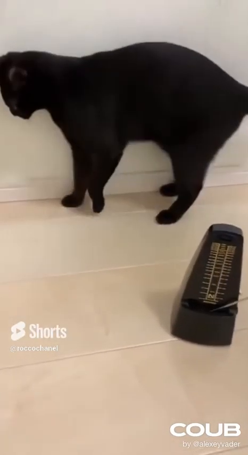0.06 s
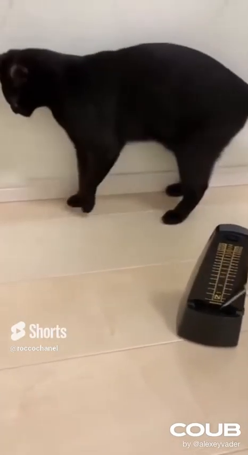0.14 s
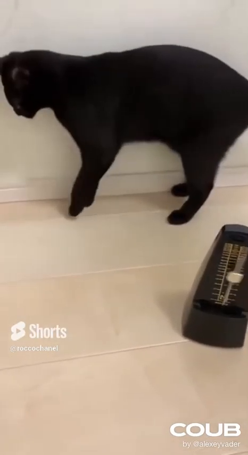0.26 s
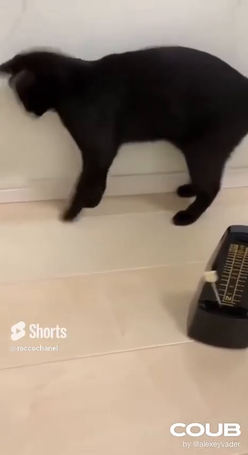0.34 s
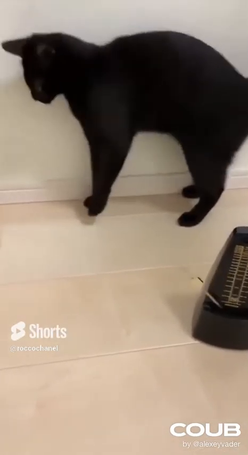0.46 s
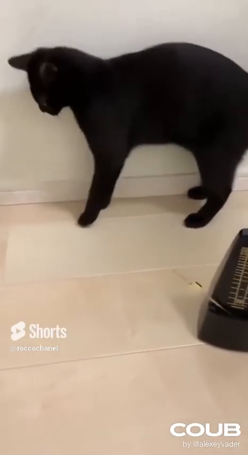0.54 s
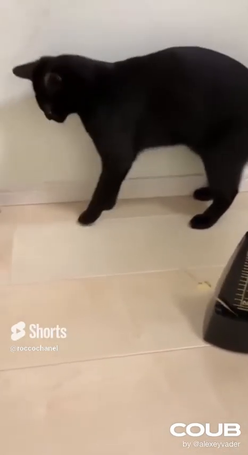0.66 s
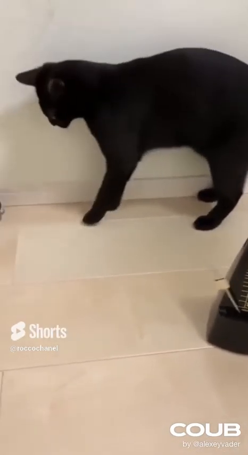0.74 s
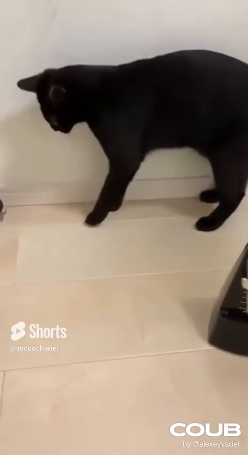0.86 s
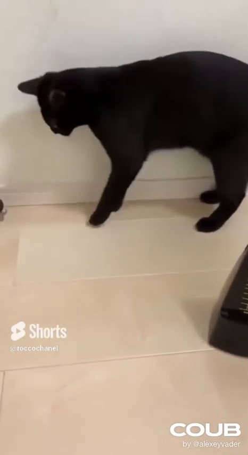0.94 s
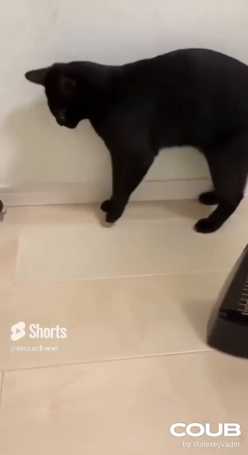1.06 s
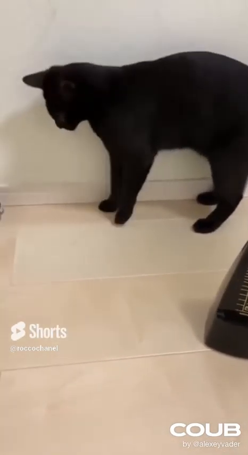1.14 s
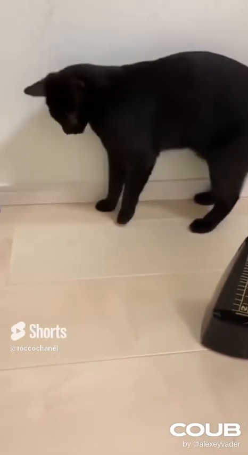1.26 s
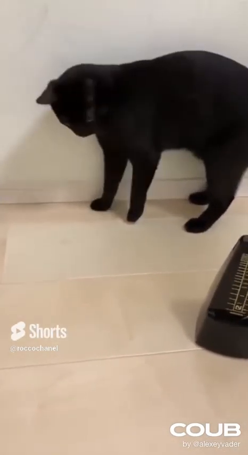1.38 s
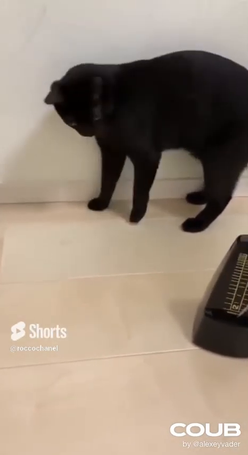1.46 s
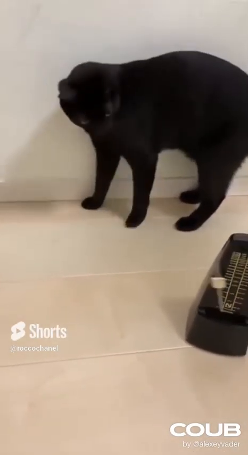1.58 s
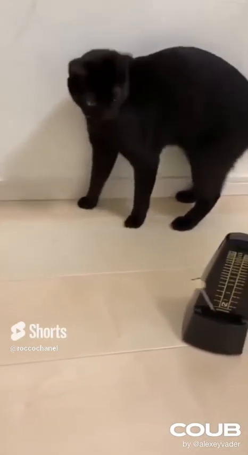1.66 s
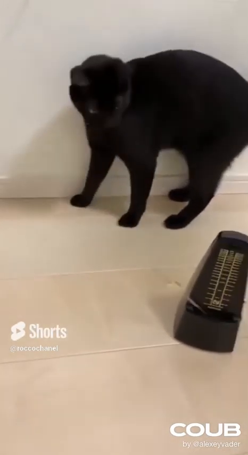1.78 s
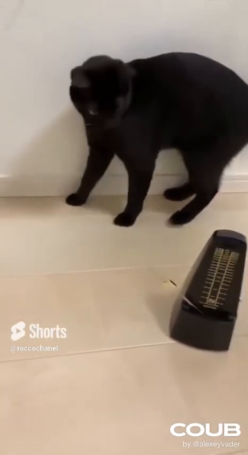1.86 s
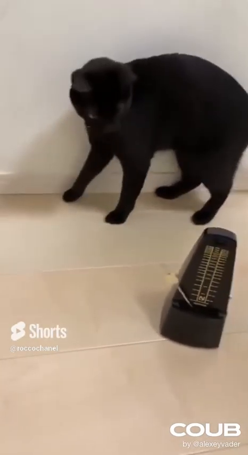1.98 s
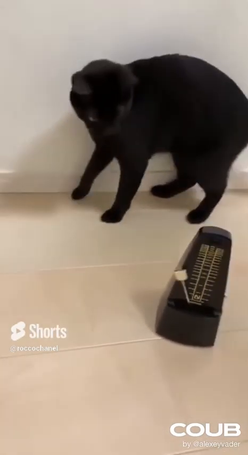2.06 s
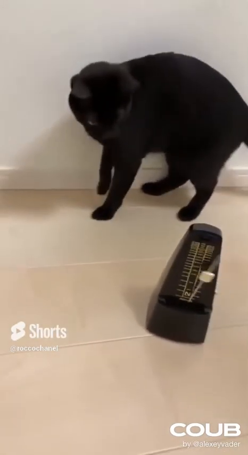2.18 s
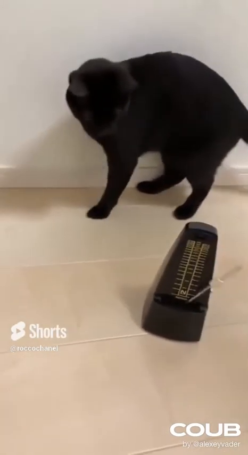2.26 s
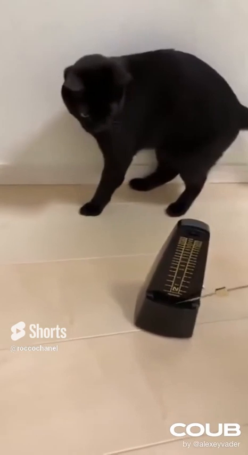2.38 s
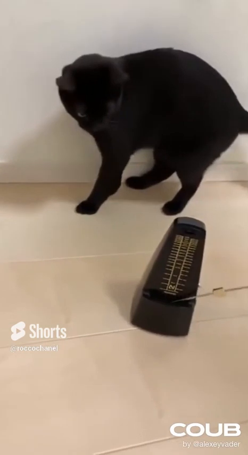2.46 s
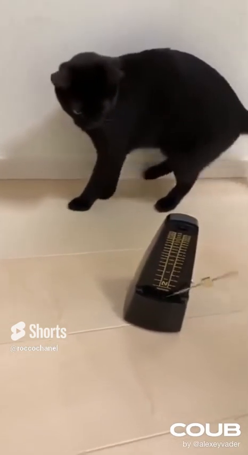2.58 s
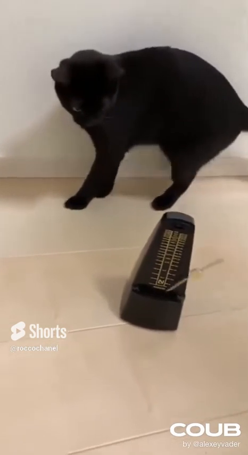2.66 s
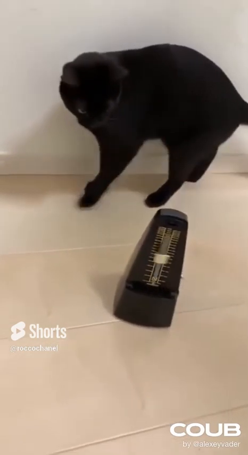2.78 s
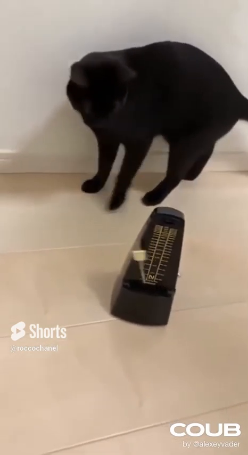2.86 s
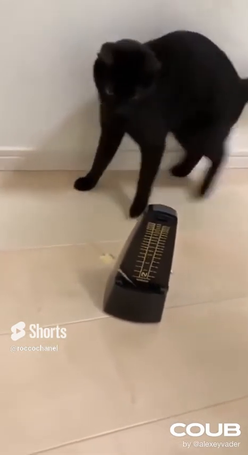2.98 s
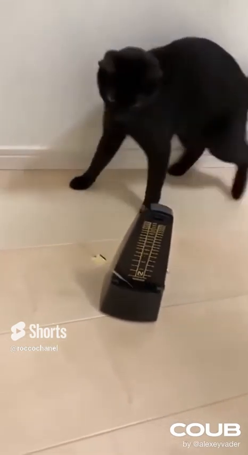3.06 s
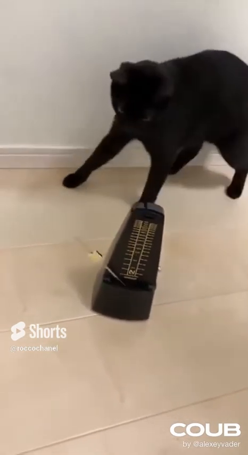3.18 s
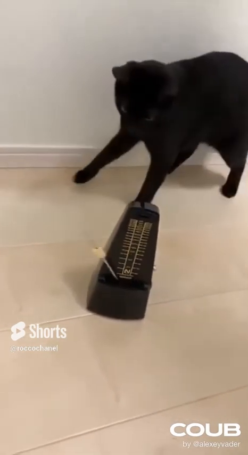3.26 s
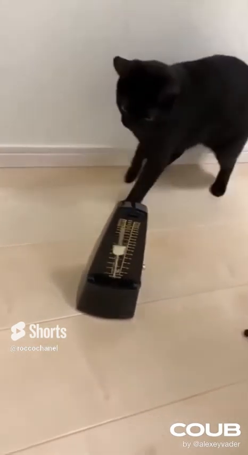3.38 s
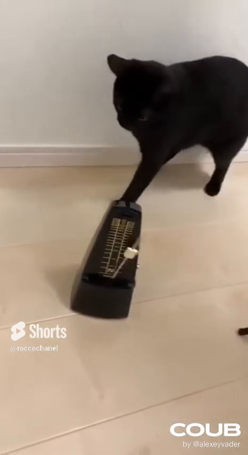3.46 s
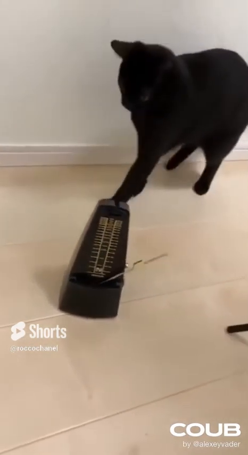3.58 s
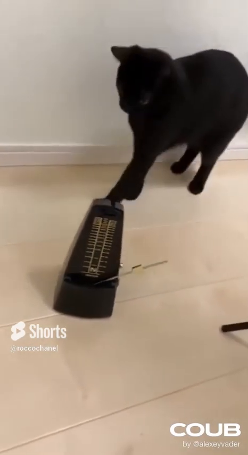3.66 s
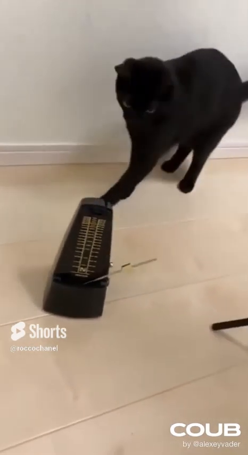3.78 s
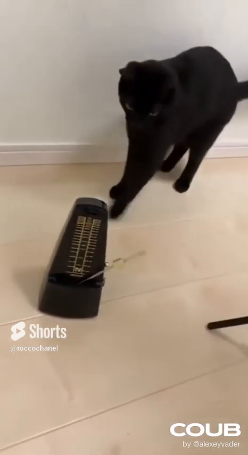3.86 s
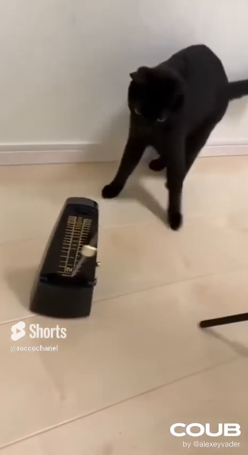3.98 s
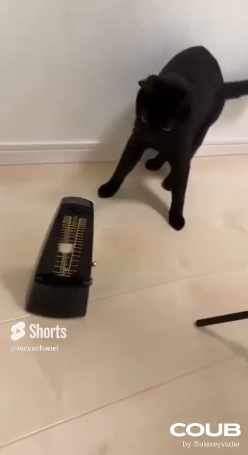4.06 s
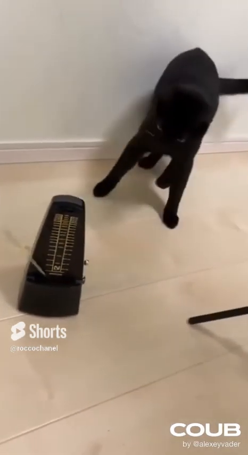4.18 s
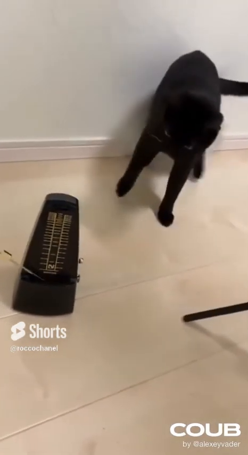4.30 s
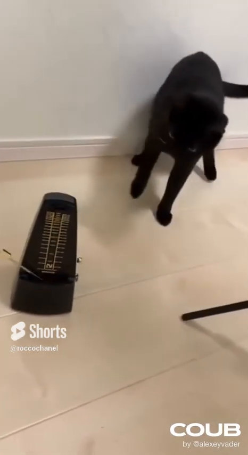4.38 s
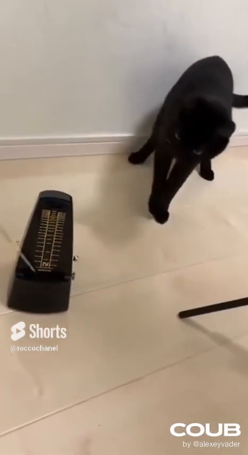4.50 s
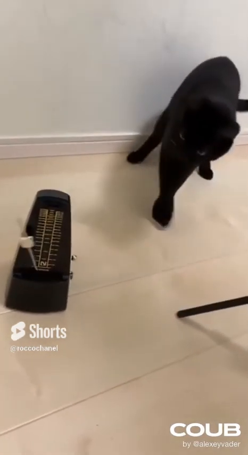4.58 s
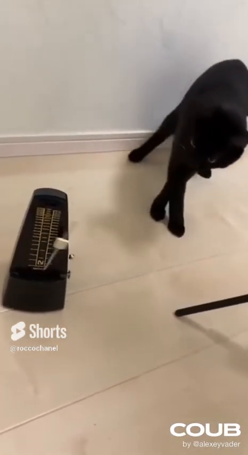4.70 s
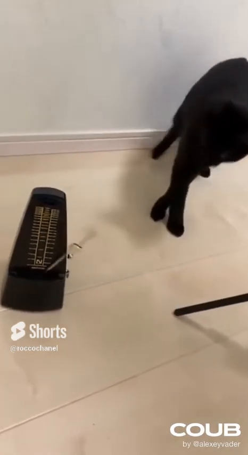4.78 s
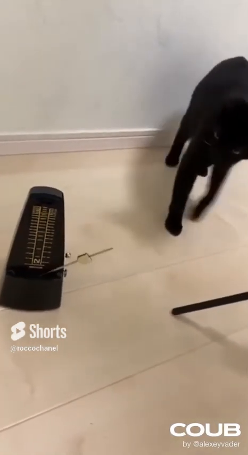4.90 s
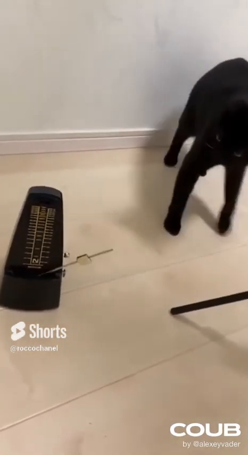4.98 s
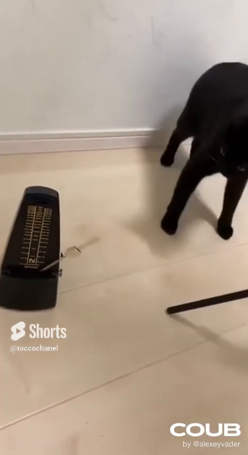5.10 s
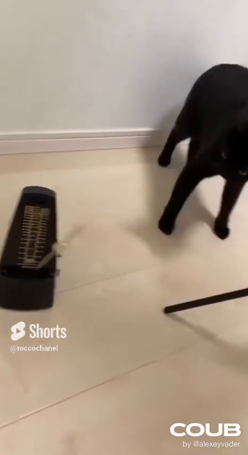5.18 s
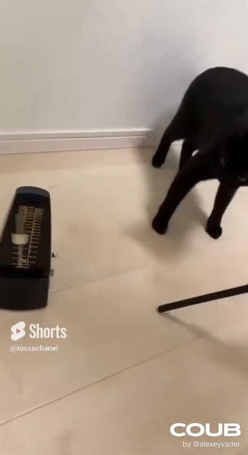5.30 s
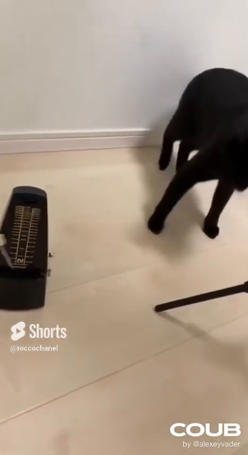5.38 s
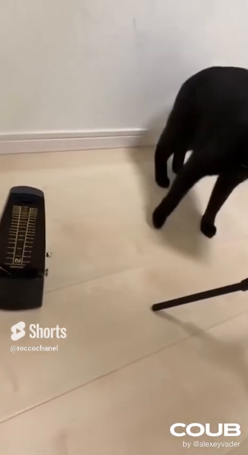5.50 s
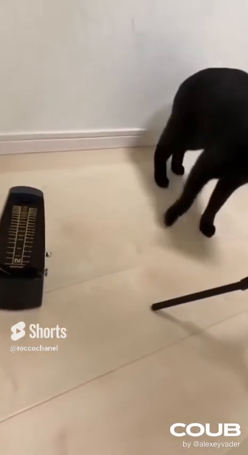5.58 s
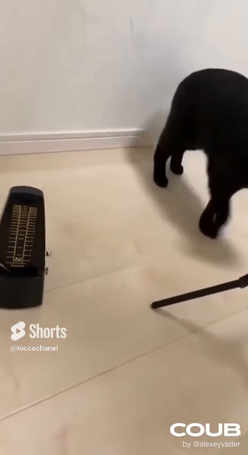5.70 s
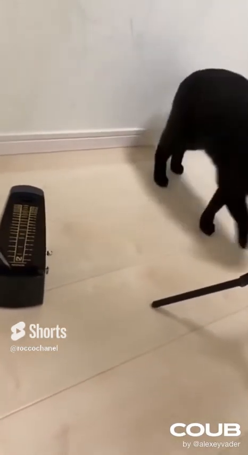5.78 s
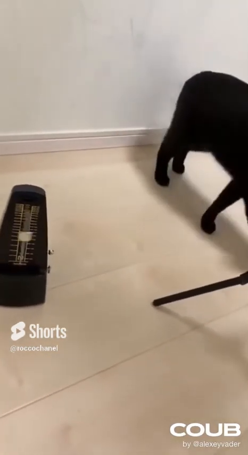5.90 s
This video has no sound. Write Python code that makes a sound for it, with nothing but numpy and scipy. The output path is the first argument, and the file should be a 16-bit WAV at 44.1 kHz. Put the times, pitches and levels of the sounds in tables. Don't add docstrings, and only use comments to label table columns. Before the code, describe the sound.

A wind-up metronome on a wooden floor gives nine hard, rattling plastic clacks, evenly spaced at about 95 per minute, each with a short diffuse room tail. Between them a cat's paws make soft, deep thuds and barely audible scuffs on the boards. A faint hum and thin hiss lie beneath. Close hand-held stereo pickup in a small bare room, slightly saturated, with patchy highs.

```python
import sys
import numpy as np
from scipy import signal
from scipy.fft import rfft, irfft, next_fast_len
from scipy.io import wavfile
from scipy.ndimage import uniform_filter1d

SR = 44100
rng = np.random.default_rng(int(sys.argv[2]) if len(sys.argv) > 2 else 0)


def inscribe(sig):
    pcm = np.round(np.clip(np.atleast_2d(sig).T, -1, 1) * 32767)
    wavfile.write(sys.argv[1], SR, pcm.astype(np.int16))


def amplitude_ratio(level_db):
    exponent = np.asarray(level_db, float) / 20
    return 10 ** exponent


N = 261954


def rms_one(x):
    return x / np.sqrt(np.mean(x ** 2) + 1e-20)


def at_hz(points, hz):
    table = np.array(points)
    return np.interp(np.log(np.maximum(hz, 1)), np.log(table[:, 0]), table[:, 1])


def ring(clicks, hz, t60):
    r, w = amplitude_ratio(-60 / (t60 * SR)), 2 * np.pi * hz / SR
    return signal.lfilter([0, np.sin(w)], [1, -2 * r * np.cos(w), r * r], clicks + 1e-18)


def swell_ring(clicks, hz, t60, swell):
    t = np.arange(round(swell * SR)) / SR
    push = 4 * np.hanning(len(t)) * np.sin(2 * np.pi * hz * t) / len(t)
    return ring(signal.fftconvolve(clicks, push)[:len(clicks)], hz, t60)


def stereo_noise(spectrum, likeness, size):
    hz = np.fft.rfftfreq(size, 1 / SR)
    mid, side = rfft(rng.standard_normal((2, size)))
    alike = np.clip(at_hz(likeness, hz), -1, 1)
    pair = np.sqrt(1 + alike) * mid + np.sqrt(1 - alike) * side * [[1], [-1]]
    return rms_one(irfft(pair * amplitude_ratio(at_hz(spectrum, hz)), size))


def add(out, piece, s):
    i = max(round(s * SR), 0)
    out[:, i:i + piece.shape[-1]] += piece[..., :N - i]


# [t/s, level/dB]
AIR = [(0.0, -61), (0.53, -59.5), (0.81, -61.5), (1.59, -61), (2.05, -58.5), (2.3, -61.5), (2.43, -60),
       (2.58, -65.5), (2.85, -64.5), (3.4, -62.5), (4.05, -59.5), (4.25, -59), (4.43, -63.5), (4.65, -63.5),
       (4.86, -61.5), (5.94, -60)]
# [f/Hz, density/dB per Hz]
HUM = [(15, -47.5), (25, -18.5), (37, -13.5), (86, -9), (129, -30), (162, -19), (187, -11), (280, -21),
       (308, -8.5), (364, -2.5), (386, -7), (400, -27.5), (430, -31), (560, -62.5), (950, -120)]
DRAUGHT = [(400, -30), (450, 1.5), (700, -4), (1000, -13), (1600, -16.5), (2500, -42.5)]
HISS = [(1000, -20), (1600, -1), (3100, -2), (4400, -6), (4800, -8), (5600, -2.5), (8500, -6.5),
        (11800, -9), (12300, -25), (16000, -31.5)]
# [f/Hz, left-right likeness/1]
AIR_LIKENESS = [(60, 0.98), (180, 1), (350, 0.96), (600, 0.28), (1650, .4), (5000, 0.85), (6500, .93),
                (15000, 0.56)]
DRAUGHT_DB, DRAUGHT_FOLLOWS, HISS_DB, HISS_FOLLOWS = -75.5, .6, -82, .2
LINGER_S, DRAUGHT_LINGER_DB, HISS_LINGER_DB = 0.18, 9, 5.5


def air():
    t, size = np.arange(N) / SR, next_fast_len(N)
    hum_db = np.interp(t, *np.transpose(AIR))
    swing_db = hum_db - hum_db.mean()
    linger = sum((t > s) * np.exp(-np.abs(t - s) / LINGER_S) for s, *_ in TICKS)
    draught_db = DRAUGHT_DB + DRAUGHT_FOLLOWS * swing_db + DRAUGHT_LINGER_DB * linger
    hiss_db = HISS_DB + HISS_FOLLOWS * swing_db + HISS_LINGER_DB * linger
    layers = zip([HUM, DRAUGHT, HISS], [hum_db + 3.0, draught_db, hiss_db])
    return sum(amplitude_ratio(db) * stereo_noise(colour, AIR_LIKENESS, size)[:, :N] for colour, db in layers)


# [t/s, peak level/dB, lower board mode against the upper/dB]
PAWS = [(0.0, -48.5, 0), (.417, -30.5, -10.5), (1.029, -42.5, -7), (1.666, -38, -8), (2.325, -40.5, 4.5),
        (2.921, -43.5, -1.5), (3.142, -36.5, -2), (3.562, -35, -2), (4.153, -50, -3.5), (4.267, -45, -1.5),
        (4.833, -35.5, -0.5), (5.135, -55, -4.5), (5.458, -30.5, -5.5)]
# [f/Hz, t60/s, swell/s]
BOARDS = [(52.8, .45, 0.076), (76.3, 0.34, 0.01)]


def paws():
    out = np.zeros(N)
    for k, (hz, t60, swell) in enumerate(BOARDS):
        clicks = np.zeros(N)
        for s, peak_db, low_db in PAWS:
            clicks[max(round(s * SR), 0)] = amplitude_ratio(peak_db - 1.5 + (0 if k else low_db))
        out += swell_ring(clicks, hz, t60, swell)
    return out


# [lead/s, rms level at the attack/dB, fainter early swell against it/dB]
SMEARS = [(.022, -23.5, -21), (.028, -29, -30.5), (.02, -33, -39.5), (0.037, -32, -23.5),
          (0.027, -29, -39.5), (0.012, -29.5, -13.5), (0.0084, -26, -17.5), (0.022, -33, -26.5),
          (0.026, -30.5, -37)]
SMEAR_POWER = 1.6
FAINT_LEAD_S, SMEAR_FADE_S = 0.039, .012


def smears():
    out, ahead_s = np.zeros((2, N)), .06
    t = np.arange(4096) / SR - ahead_s
    for (lead, level_db, faint_db), (start, _, pan_db, _, alike) in zip(SMEARS, TICKS):
        swell = np.clip(1 + t / lead, 0, 1) ** SMEAR_POWER
        swell += amplitude_ratio(faint_db) * np.clip(1 + t / FAINT_LEAD_S, 0, 1)
        fade = np.exp(-np.maximum(t, 0) / SMEAR_FADE_S)
        noise = stereo_noise(CRACK, [(200, 1.0), (6000, 0.27 + 0.19 * alike), (10000, alike)], 4096)
        gain = amplitude_ratio(level_db + pan_db * np.array([[.5], [-.5]]))
        add(out, gain * swell * fade * noise, start - ahead_s)
    return out


# [delay t/s, strength level/dB]
CONTACTS = [
    (0, -7.5),
    (.0011, -5.5),
    (.0022, 3),
    (.0039, -5),
    (.0056, -6),
    (.0074, -11),
    (.011, -7),
]
# [f/Hz, level/dB, t60/s]
CASE = [(504, -18.5, 0.14), (726, -28.5, 0.15), (767, -24.5, 0.061), (850, -18.5, 0.08),
        (1104.8, -6.5, 0.071), (1305, -19.5, 0.18), (1713, -14, 0.019), (1740, -18, 0.018),
        (2150, -17.5, 0.046), (2510, -11, 0.013), (3220, -17.5, 0.037), (3500, -14, 0.065),
        (4022, -11, 0.063), (5560, -16.5, 0.035), (6300, -20.5, 0.0047), (7360, -13, 0.028),
        (7900, -15.5, .03), (9260, -13.5, 0.012)]
# [f/Hz, density/dB per Hz]
CRACK = [(120, -43.5), (200, -7), (1140, -6), (1440, -9), (1730, -4), (2940, -12.5), (3400, -8),
         (4010, -5.5), (4640, -9), (7470, -12.5), (9300, -12), (10200, -11), (15800, -28.5)]


def tick(size, bright_db, alike):
    delay, strength_db = np.transpose(CONTACTS)
    at = np.round((delay + rng.normal(0, .00025, len(delay)) + .0005) * SR).clip(0).astype(int)
    body, clicks = np.zeros((2, size)), np.zeros((2, size))
    for hz, level_db, t60 in CASE:
        uneven_db = rng.normal(0, 2.9, len(at))
        uneven_db = uneven_db + (1.0 - alike) * rng.normal(0, 0.28, (2, len(at)))
        clicks[:, at] = amplitude_ratio(strength_db + uneven_db)
        mode = ring(clicks * rng.choice([-1, 1], size), hz, t60)
        body += amplitude_ratio(level_db + rng.normal(0, 1.0)) * mode / np.abs(mode).max()
    clicks[:, at] = amplitude_ratio(strength_db)
    gate = signal.lfilter([1], [1, -amplitude_ratio(-60 / (0.017 * SR))], clicks)
    crack = gate * stereo_noise(CRACK, [(200, 1.0), (6000, 1.6 + 0.1 * alike), (10000, alike)], size)
    radiation = [(120, -18), (400, -2), (4000, -0.5), (16000, 2 * bright_db)]
    turn = amplitude_ratio(at_hz(radiation, np.fft.rfftfreq(size, 1 / SR)))
    return irfft(rfft(amplitude_ratio(-1.5) * body + amplitude_ratio(-8) * crack) * turn, size)


# [f/Hz, t60/s]
ROOM_T60 = [(100, 0.85), (260, 0.38), (700, 0.27), (1840, 0.26), (4850, 0.25), (12800, 0.25)]
# [f/Hz, level/dB]
ROOM_COLOUR = [(100, 5), (300, -3.5), (1000, 2), (3000, 1), (7000, -1), (15000, 0)]
# [f/Hz, left-right likeness/1]
ROOM_LIKENESS = [(60, 0.98), (180, 1), (550, 0.23), (1650, 0.16), (4970, 0.052), (15000, 0.36)]


def room_echo(size):
    t, out = np.arange(size) / SR, 0
    noise = stereo_noise(ROOM_COLOUR, ROOM_LIKENESS, size)
    edges = 60 * 2 ** np.arange(0, 8.6, .5)
    for low, high in zip(edges, edges[1:]):
        hz = np.sqrt(low * high)
        sos = signal.butter(2, [low, min(high, 19000)], "band", fs=SR, output="sos")
        band = signal.sosfilt(sos, noise)
        build = 1 - np.exp(-t / (0.0082 + 1.0 / hz))
        out = out + band * build * amplitude_ratio(-60 * t / at_hz(ROOM_T60, hz))
    return out


# [t/s, peak level/dB, left-right pan/dB, brightness/dB per octave above 4 kHz,
#         left-right likeness of the highs/1]
TICKS = [
    (0.388, -11, -2, 2.1, .55),
    (1.02, -10, 0.3, 1.5, 0.41),
    (1.647, -7, -0.2, 0.9, 0.84),
    (2.281, -11.5, -2.5, 1.3, 0.22),
    (2.906, -10, 0.3, 2, 0.15),
    (3.539, -7.5, -0.1, 1.5, 0.4),
    (4.167, -9, -0.35, 2, 0.23),
    (4.8, -7.5, 0.4, -0.1, 1),
    (5.429, -10.5, 0, -3, 0.13),
]
# [f/Hz, level/dB, t60/s, swell/s]
BOOM = [(157, -27.5, 0.11, 0.038), (305.4, -27, 0.21, 0.019), (344, -33.5, 0.39, 0.033)]
TAIL_GAP_DB = -9.5
SPRING_DB = -7.5


def metronome():
    out, size, beat = np.zeros((2, N)), 2 ** 15, np.zeros(N)
    echoes = [room_echo(size), room_echo(size)]
    hz = np.fft.rfftfreq(2 * size, 1 / SR)
    gaps_db = sum(TAIL_GAP_DB * np.exp(-((hz - centre) / width * 2) ** 2) for centre, width, _ in GAPS)
    directs = [tick(size, bright_db, np.clip(alike, -1, 1)) for *_, bright_db, alike in TICKS]
    powers = uniform_filter1d(np.mean(np.abs(rfft(directs, 2 * size)) ** 2, axis=1), size=24)
    for k, (s, peak_db, pan_db, _, _) in enumerate(TICKS):
        wander = .6 * echoes[0] + 0.94 * np.roll(echoes[1], 7 * k, axis=1)
        spread = np.sqrt(0.99 * powers.mean(axis=0) + 0.16 * powers[k])
        tail = irfft(spread * amplitude_ratio(gaps_db) * rfft(wander, 2 * size))[:, :size]
        gain = amplitude_ratio(peak_db + pan_db * np.array([[.5], [-.5]]))
        add(out, gain * (directs[k] + amplitude_ratio(SPRING_DB - peak_db - 26) * tail), s)
        beat[round(s * SR)] = amplitude_ratio(SPRING_DB)
    return out + sum(amplitude_ratio(db) * swell_ring(beat, hz, t60, swell) for hz, db, t60, swell in BOOM)


# [t/s, rms level/dB, length/s, centre f/Hz]
SCUFFS = [
    (0.823, -79.5, .06, 11070),
    (2.001, -69, 0.027, 6600),
    (2.567, -70.5, 0.039, 7500),
    (3.1, -64.5, 0.073, 4970),
    (4.088, -70, 0.053, 5000),
    (4.993, -76, 0.026, 7530),
    (5.257, -63.5, 0.014, 5600),
    (5.363, -65, .03, 1390),
]


def scuffs():
    out = np.zeros((2, N))
    for s, level_db, length, hz in SCUFFS:
        colour = [(hz / 6, -24), (hz / 2, -4), (hz, 0), (hz * 1.8, -6), (hz * 3.0, -18)]
        puff = stereo_noise(colour, [(100, .8), (9000, .8)], 8192)
        t = np.arange(8192) / SR / length
        add(out, amplitude_ratio(level_db) * puff * np.e * t * np.exp(-t * 2.0), s)
    return out


def scene():
    return metronome() + smears() + paws() + scuffs() + air()


# [f/Hz, mid level/dB, side level/dB]
STARVED = [(4200, -38, -40), (4700, -22, -24), (5300, -36, -26), (7500, -31, -16), (9000, -25, -17),
           (12000, -21, -19), (16000, -25, -21)]
SHORTAGE_DB = 2.5
DROUGHT_S, DROUGHT_WIDTH_S, DROUGHT_DB = 4.925, .06, 17


def starve(x, patchy_db, quiet_db, loud_db, coarse_share):
    stft = dict(window="cosine", nperseg=2048, noverlap=1024)
    hz, when, frames = signal.stft([x[0] + x[1], x[0] - x[1]], SR, **stft)
    edges = np.searchsorted(hz, np.arange(4400, 17000, 480))
    power = np.abs(frames) ** 2 + 1e-20
    frame_db = 10 * np.log10(power[:, 30:].sum(axis=(0, 1)))
    luck = rng.standard_normal((2, len(edges), frames.shape[-1]))
    luck = uniform_filter1d(luck, size=4, axis=-1) * 2
    short_db = SHORTAGE_DB + DROUGHT_DB * np.exp(-((when - DROUGHT_S) / DROUGHT_WIDTH_S) ** 4)
    spare_db = np.clip(quiet_db - frame_db, 0, 15) + np.clip(frame_db - loud_db, 0, 15)
    middling = (frame_db > quiet_db) * (frame_db < loud_db)
    for k, (low, high) in enumerate(zip(edges, edges[1:])):
        limit_db = np.array([[at_hz(np.array(STARVED)[:, [0, c]], hz[low])] for c in (1, 2)])
        band = power[:, low:high]
        margin_db = 10 * np.log10(band.sum(axis=1)) - frame_db - limit_db - patchy_db * luck[:, k]
        margin_db += spare_db - short_db * np.clip((hz[low] - 7000) / 2000, 0, 1)
        coarse = np.clip((hz[low] - 3000) / 7000, 0, 1) * np.clip(coarse_share, 0, 1) * middling
        kept = band > coarse * band.mean(axis=1, keepdims=True)
        makeup = band.sum(axis=1, keepdims=True) / (band * kept).sum(axis=1, keepdims=True)
        frames[:, low:high] *= kept * np.sqrt(makeup)
        frames[:, low:high] *= np.clip(margin_db / 2 + .5, .005, 1)[:, None]
    mid, side = signal.istft(frames, SR, **stft)[1][:, :N]
    return np.array([mid + side, mid - side]) / 2


def low_pass(x):
    return signal.sosfilt(signal.butter(12, 16960, fs=SR, output="sos"), x)


# [centre f/Hz, width/Hz, level/dB]
GAPS = [(4660, 640, -8), (10210, 600, -6)]


def record(dry):
    size = next_fast_len(N)
    hz = np.fft.rfftfreq(size, 1 / SR)
    dips_db = sum(db * np.exp(-((hz - centre) / width * 2) ** 2) for centre, width, db in GAPS)
    edges_db = at_hz([(15, -25.5), (42, 0.5), (15900, -0.5), (16300, -47.5)], hz)
    rounded = 0.77 * np.tanh(dry / 0.81)
    filtered = irfft(rfft(rounded, size) * amplitude_ratio(dips_db + edges_db), size)[:, :N]
    mix = starve(filtered, patchy_db=11.0, quiet_db=-61.0, loud_db=-38, coarse_share=0.98)
    return low_pass(mix)


dry = scene()
out = record(dry)
inscribe(out)
```